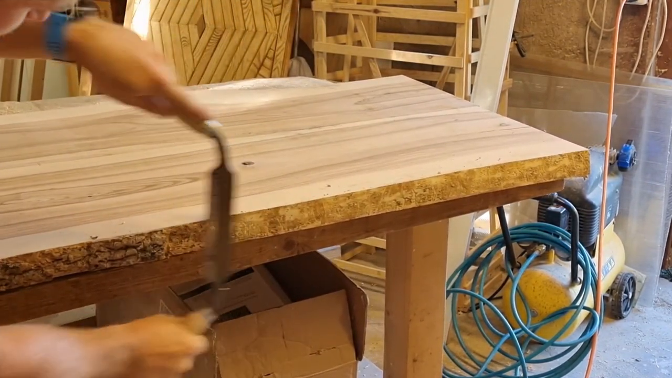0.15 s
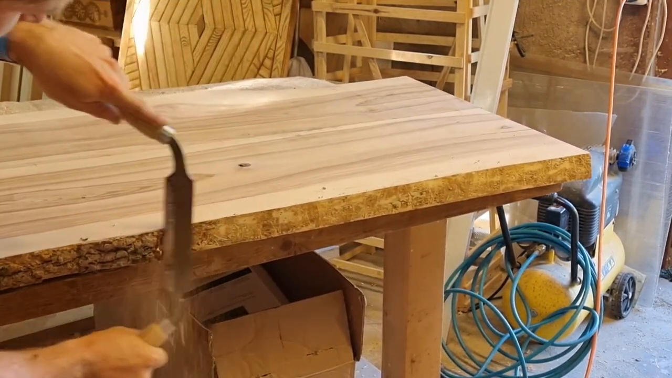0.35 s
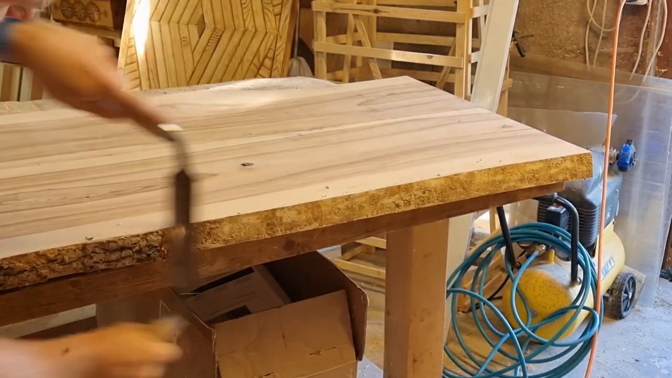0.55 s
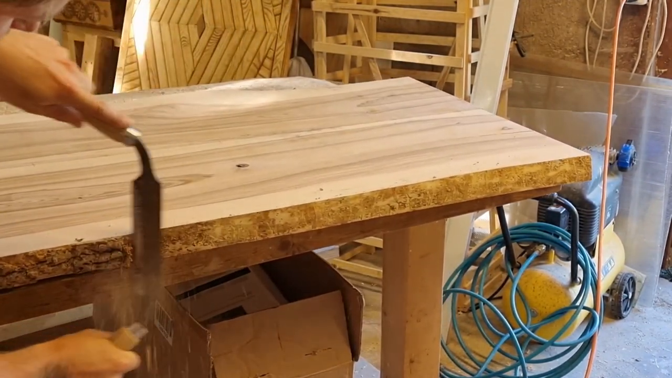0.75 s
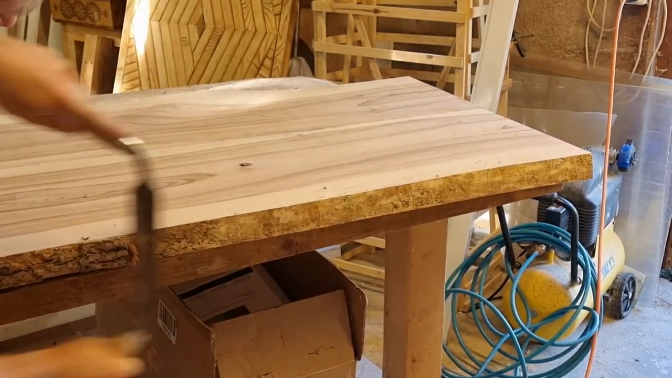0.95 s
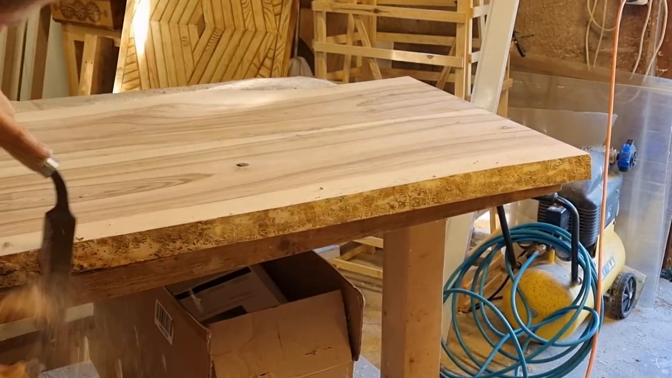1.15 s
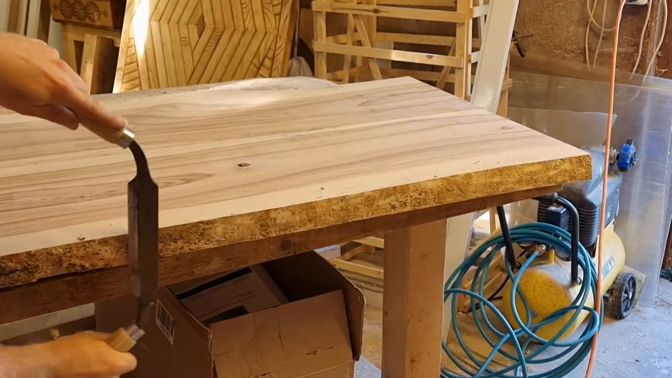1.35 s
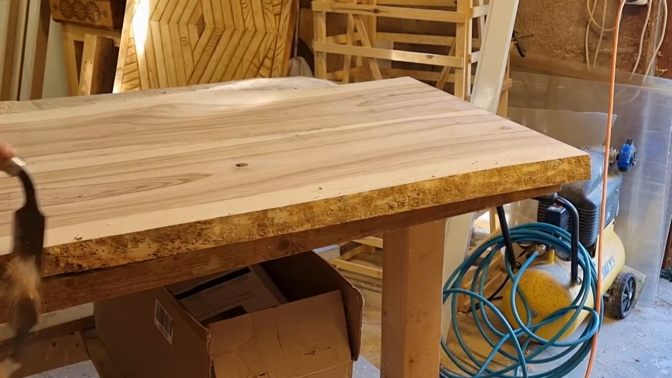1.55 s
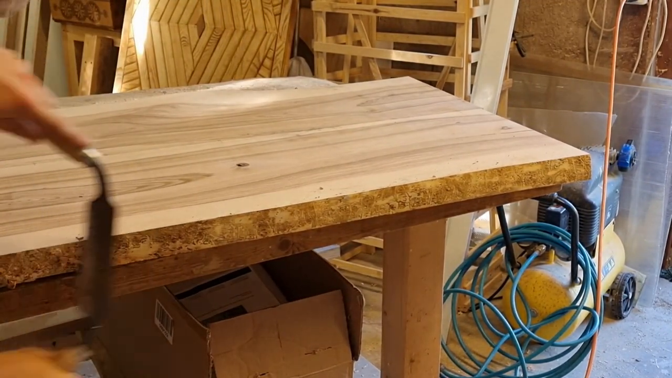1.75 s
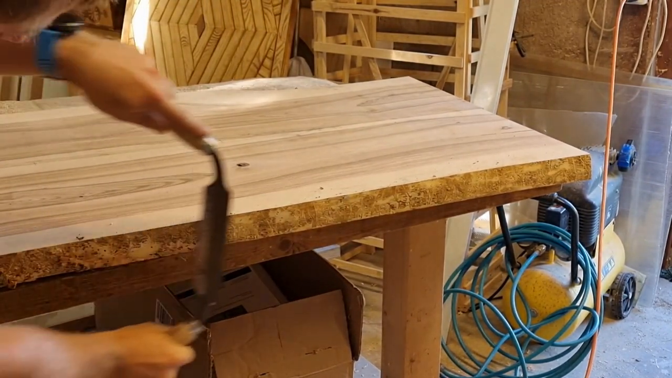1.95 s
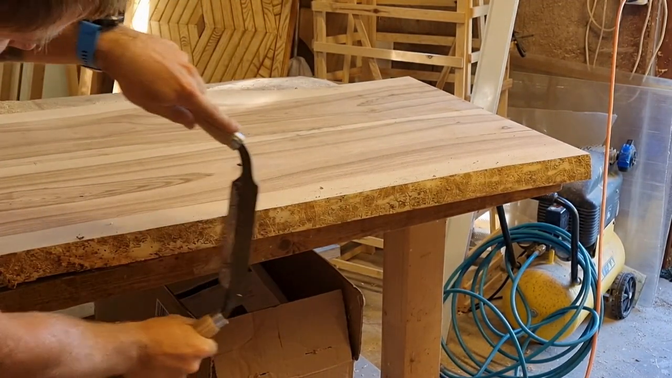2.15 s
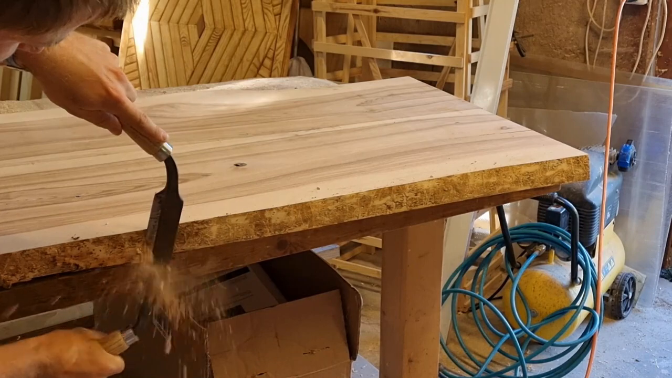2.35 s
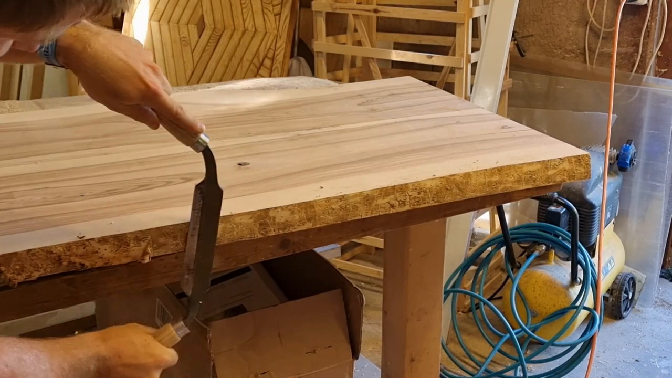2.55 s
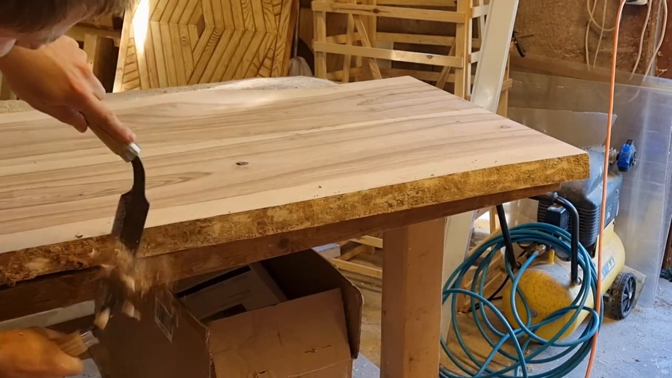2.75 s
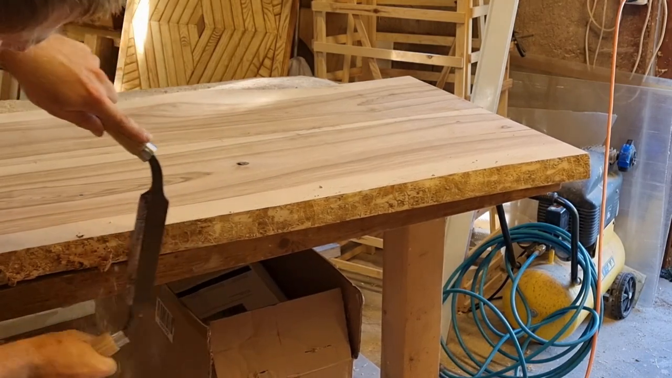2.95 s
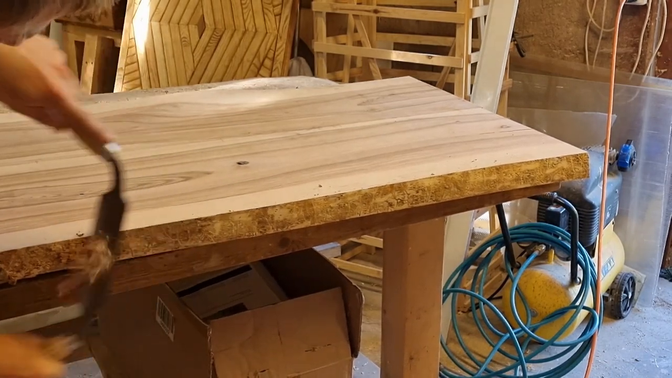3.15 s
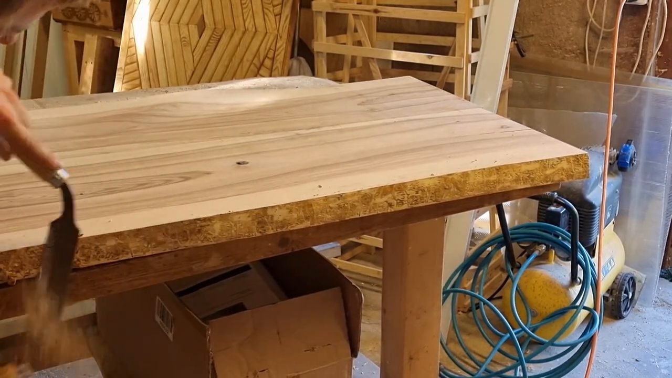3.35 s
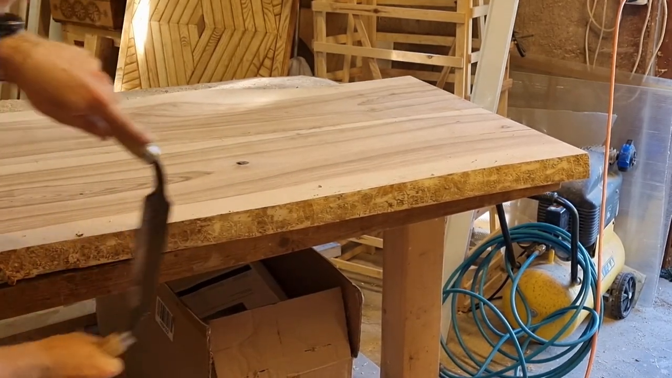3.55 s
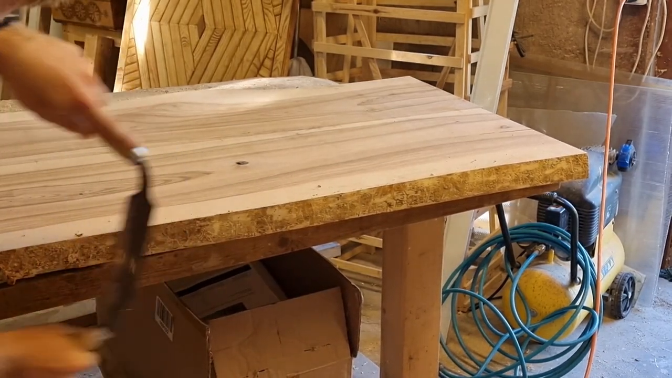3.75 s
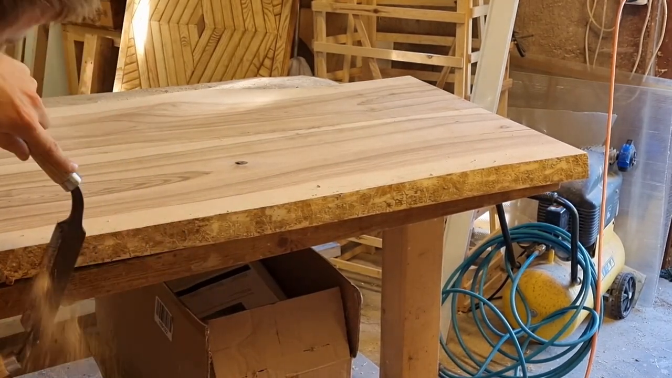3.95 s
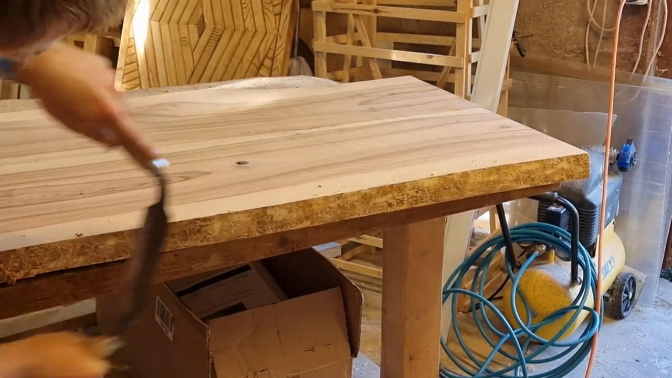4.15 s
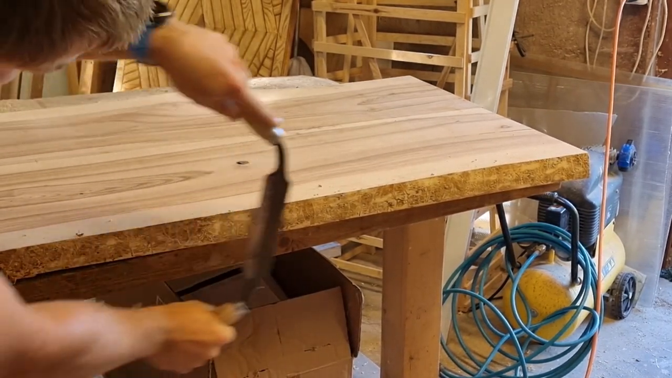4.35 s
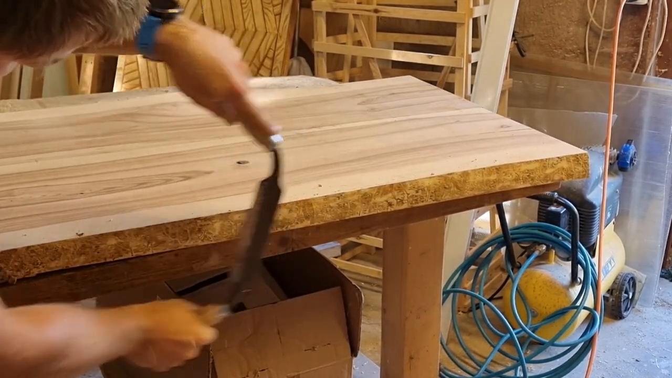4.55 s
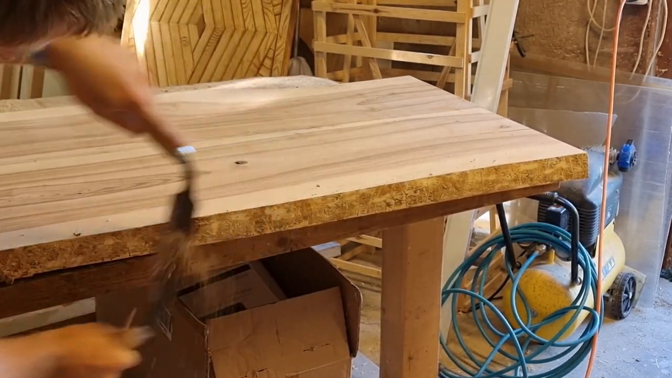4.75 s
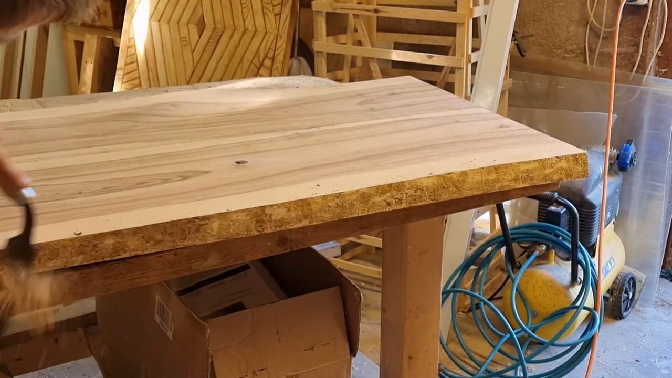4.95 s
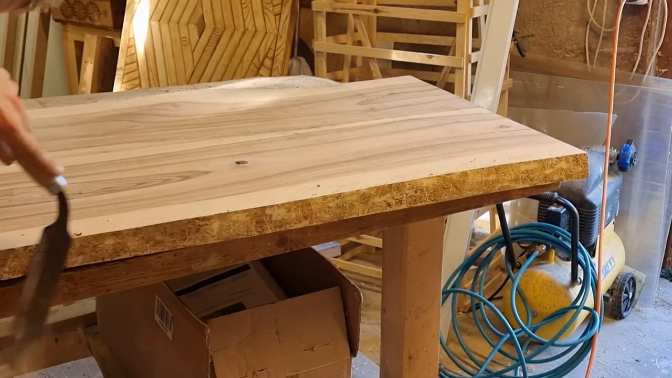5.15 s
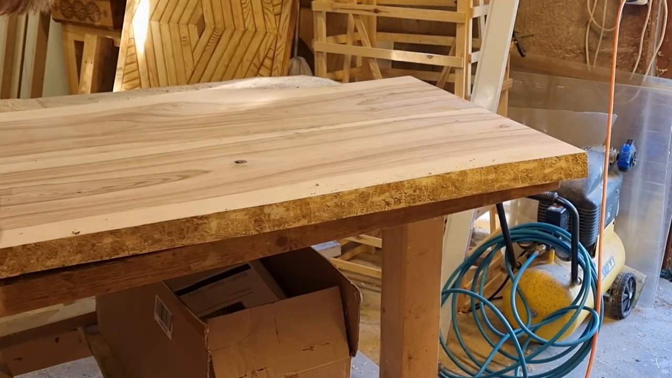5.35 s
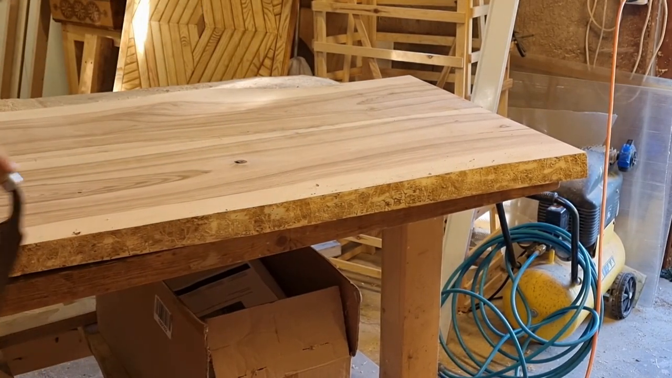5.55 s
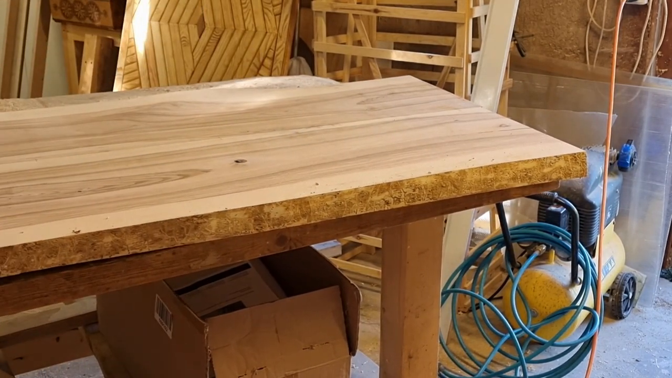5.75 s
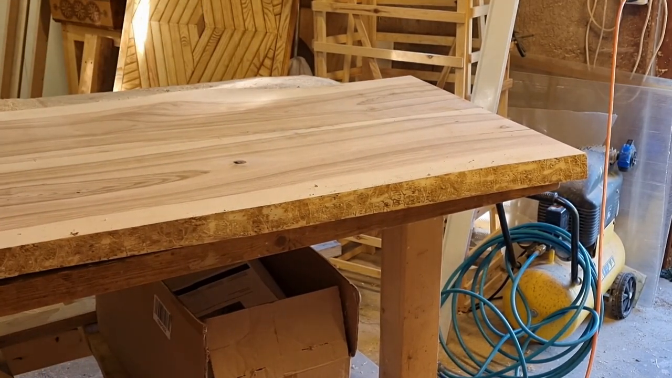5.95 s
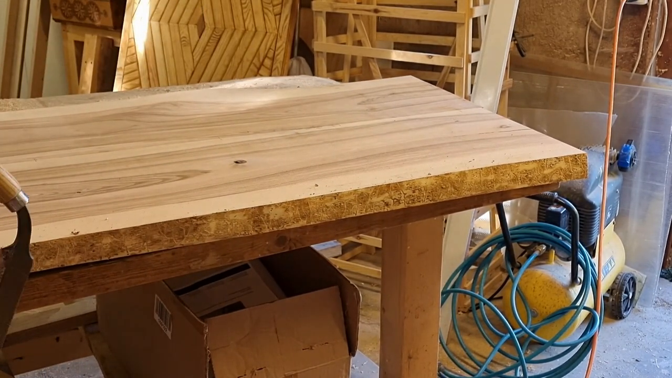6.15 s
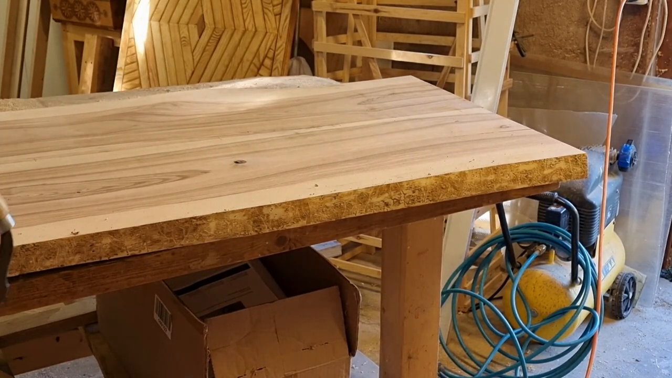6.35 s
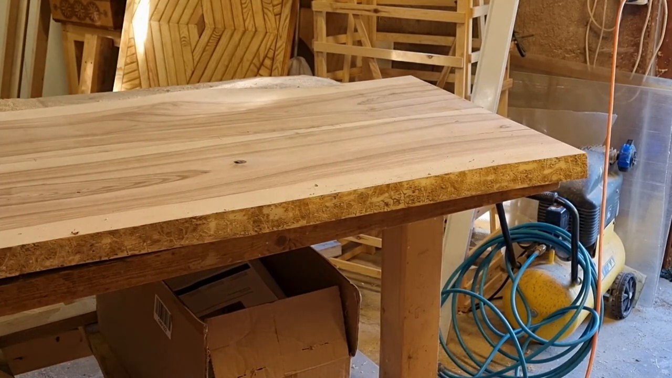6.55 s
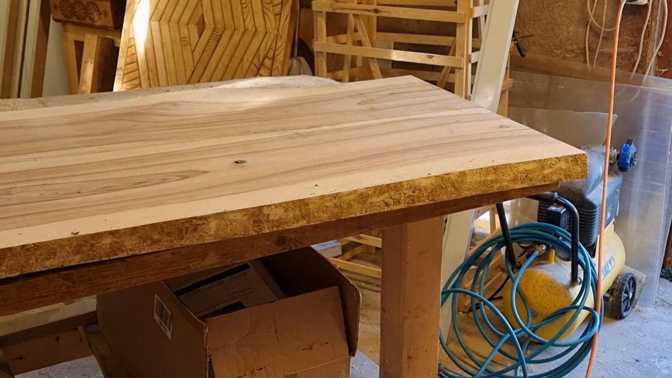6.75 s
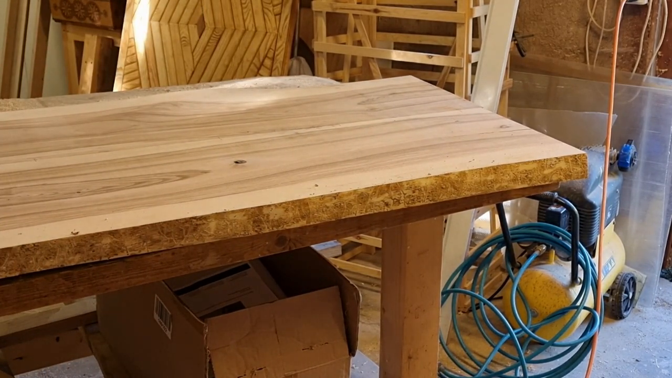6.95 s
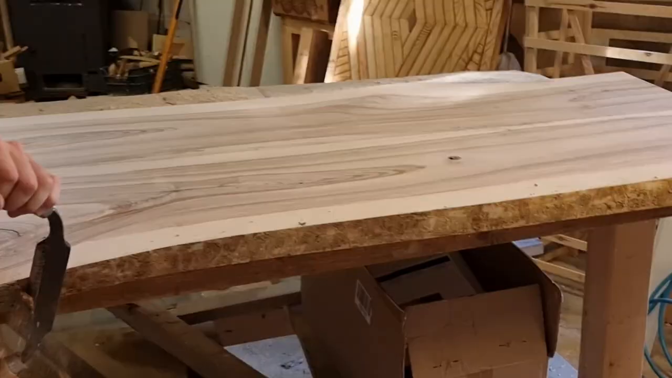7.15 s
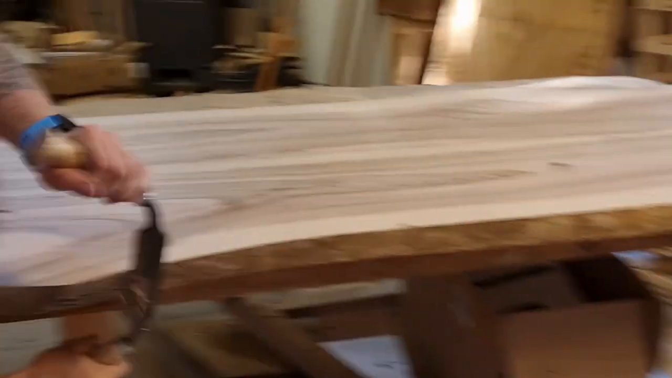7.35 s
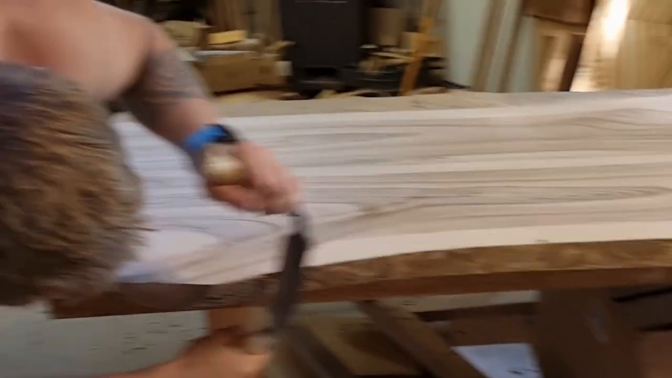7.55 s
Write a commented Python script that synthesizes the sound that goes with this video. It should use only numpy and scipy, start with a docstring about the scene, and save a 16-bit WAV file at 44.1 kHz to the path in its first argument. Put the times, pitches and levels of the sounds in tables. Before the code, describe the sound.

Quick, rasping blade pulls tear bark from a thick slab, mixed with small snaps and knocks, and a brief low rumble at the end.

```python
"""In the quiet air of a small workshop, a drawknife works the bark edge of a thick slab, left of a phone.
Pull after pull, the blade chatters through the bark, which tears with a hiss while the slab rings.
Single fibres snap, short woody clacks ring out with a dry crack, and the blade drags lightly between cuts.
Near the end, around the last pull, the phone is handled and rumbles."""
import sys
import numpy as np
from scipy import signal
from scipy.fft import rfft, irfft, next_fast_len
from scipy.io import wavfile
from scipy.ndimage import uniform_filter1d

SR = 44100
rng = np.random.default_rng(int(sys.argv[2]) if len(sys.argv) > 2 else 0)


def pcm_store(signal):
    """Save signal as 16-bit PCM."""
    levels = np.round(np.clip(np.atleast_2d(signal), -1, 1) * 32767)
    wavfile.write(sys.argv[1], SR, levels.astype(np.int16).T)


N = 339570
T = np.arange(N) / SR
CONTROL_T = np.arange(0, N / SR, .001)  # envelope clock, in seconds


def undb(db):
    return 10 ** (np.asarray(db) / 20)


def set_rms(x, db):
    return x * undb(db) / np.sqrt(np.mean(x ** 2))


def eq(x, points):
    """Shape a signal along (freq_hz, gain_db) points."""
    hz, db = np.transpose(points)
    size = next_fast_len(N)
    bins_hz = np.arange(size // 2 + 1) * SR / size
    gain = undb(np.interp(np.log(bins_hz + 1), np.log(hz), db))
    return irfft(rfft(x, size) * gain, size)[..., :N]


def resonate(x, hz, width_hz):
    """One resonance, gain 1 at its centre."""
    return signal.lfilter(*signal.iirpeak(hz, hz / width_hz, SR), x)


def wander(rate_hz):
    """Glides between random values; spread near 1."""
    hold = int(SR / rate_hz)
    return 1.12 * uniform_filter1d(np.repeat(rng.standard_normal(N // hold + 1), hold), hold)[:N]


def clicks(per_s, spread_db):
    """Random impulses, mostly small and a few large; rms 1."""
    when, size = rng.random((N, 2)).T
    impulses = (when < per_s / SR) * undb(-spread_db * np.log(size + 0.0025))
    return set_rms(impulses * np.sign(rng.standard_normal(N)), 0)


def add(track, start_s, sound):
    i = int(start_s * SR)
    track[i:i + len(sound)] += sound[:N - i]


def envelopes(start_s, attack_s, hold_s, db, fade_db_per_s):
    """One gain curve per blade contact: climb 40 dB over the attack up to start_s, hold, fade."""
    t = CONTROL_T - start_s[:, None]
    rise_db = 40 * np.minimum(t / np.reshape(attack_s, (-1, 1)), 0)
    fade_db = fade_db_per_s * np.maximum(t - hold_s[:, None], 0)
    return undb(db[:, None] + rise_db - fade_db)


def workshop_air():
    """A quiet, dark bed of room tone, centred in the bass and wide in the treble."""
    mid, side = eq(rng.standard_normal((2, N)),
                   [(30, -2), (81, 8), (666, 0), (1350, -5.5), (7270, -21.5), (13000, -17), (16000, -37.5)])
    side = eq(side, [(100, -13), (1500, 0.5)])
    return set_rms(np.array([mid + side, mid - side]), db=-59)


# Cutting pulls: bite_s, attack_s, tear_hold_s, tear_db, ring_hold_s, ring_db
PULLS = [(-.04, .01, 0.027, -44, 0.014, -36.5), (0.293, 0.053, 0.048, -33, 0.094, -35),
         (0.671, 0.0099, 0.039, -28.5, 0.058, -33.5), (1.07, 0.019, 0.049, -31, 0.019, -29),
         (1.664, 0.049, 0.0049, -31, 0.061, -43.5), (2.338, 0.092, 0.062, -35, 0.064, -32.5),
         (2.796, 0.024, 0.049, -33.5, 0.06, -31.5), (3.248, 0.037, 0.051, -34.5, 0.085, -34),
         (3.929, 0.16, 0.015, -40, 0.048, -33.5), (5.048, 0.076, 0.03, -33.5, 0.02, -29),
         (5.436, 0.0042, 0.004, -24.5, 0.067, -27), (5.865, 0.025, 0.011, -32, 0.015, -37),
         (7.461, 0.031, 0.066, -34, 0.092, -31.5)]
# Light touches and drags between cuts: start_s, hold_s, hiss_db, ring_db, ring_tilt_db_per_octave
DRAGS = [(0.24, 0.015, -76, -56, 13.5), (0.602, 0.11, -51.5, -48, 7.5), (0.76, 0.029, -45.5, -37, -1.5),
         (1.15, 0.056, -43.5, -40.5, 8.5), (1.499, 0.099, -44, -44, 15.5), (1.827, 0.069, -60, -92, 31.5),
         (2.076, 0.083, -52, -50.5, -3), (2.261, 0.052, -85, -52, 13), (2.633, 0.028, -95, -61, -11),
         (3.659, 0.065, -89, -41, -1), (3.737, 0.016, -54, -59.5, -5), (3.844, 0.089, -75, -49.5, 11.5),
         (4.243, 0.094, -80, -57, -2.5), (4.334, 0.048, -84, -43.5, -5), (4.406, 0.0098, -47.5, -60, -8),
         (4.701, 0.336, -58.5, -46, 6.5), (5.25, 0.097, -107, -49.5, -8.5), (5.779, 0.11, -69, -34, -1),
         (6.087, 0.011, -55, -37.5, 6), (6.291, 0.012, -43, -29, -1), (6.413, 0.093, -56, -63.5, 16.5),
         (6.596, 0.044, -48, -68, 22.5), (6.758, 0.32, -63, -93, 5), (6.989, 0.0089, -71, -66.5, 18.5),
         (7.187, 0.03, -50, -35, -5), (7.313, 0.084, -83, -47.5, -12), (7.411, 0.086, -51, -53, 16.5),
         (7.558, 0.017, -36, -46.5, -6)]


def drawknife():
    """Each pull or drag tears the bark and rings the slab; in a pull the slab loads later and slower."""
    bite_s, attack_s, tear_hold_s, tear_db, ring_hold_s, ring_db = np.transpose(PULLS)
    pull_tear = envelopes(bite_s, attack_s, tear_hold_s, tear_db, fade_db_per_s=316.5).sum(0)
    pull_ring = envelopes(bite_s + 0.014, attack_s + 0.071, ring_hold_s, ring_db, 270.5).sum(0)
    start_s, hold_s, hiss_db, drag_db, tilt = np.transpose(DRAGS)
    drag_hiss = envelopes(start_s, 0.0036, hold_s, hiss_db, 242.5).sum(0)
    drag_rings = envelopes(start_s, 0.0036, hold_s, drag_db, 242.5)

    def drive_at(hz):
        tilt_gains = undb(tilt * np.log2(hz / 400))  # each drag has its own brightness
        return np.interp(T, CONTROL_T, pull_ring + tilt_gains @ drag_rings)

    return slab_ring(drive_at) + bark_tear() * np.interp(T, CONTROL_T, pull_tear + drag_hiss)


# Resonances of slab and bench: pitch_hz, width_hz, level_db
SLAB_MODES = [(103, 26, -5.5), (253.6, 36, -0.5), (296.5, 14, -7.5), (342.8, 17, 5.5), (394, 28, 2),
              (501, 26.4, 1.5), (601, 160, -3), (810, 36, -1.5), (970.5, 107, -4), (1288, 33, -7.5),
              (1550, 25, -14.5)]


def slab_ring(drive_at):
    """The woody body: uneven chatter feeds each mode more or less as the blade moves along the edge."""
    chatter = clicks(per_s=4000, spread_db=2.5) * undb(3.37 * wander(45))
    body = np.zeros(N)
    for hz, width_hz, db in SLAB_MODES:
        drift = undb(2.5 * wander(8))
        body += undb(db) * resonate(chatter * drive_at(hz) * drift, hz, width_hz)
    return eq(body, [(45, -22), (110, 1.5), (2200, -2), (5000, -7.5)]) * undb(16)


# Tone of tearing bark: freq_hz, gain_db
TEAR_EQ = [(800, -2.5), (2300, 4), (3500, 4), (5100, 5.5), (8400, -1.5), (10500, -1.5), (12600, 3),
           (15300, 2)]


def bark_tear():
    """Dense fibre clicks make a hiss; a long blade tears in several places, so the two mics differ."""
    shared = clicks(per_s=9000, spread_db=2.1)
    fibres = shared + 2.2 * np.array([clicks(9000, 3.2), clicks(9000, 3.1)])
    bursts = signal.lfilter([1], [1, -.993], np.abs(clicks(160, 2.7)))
    flicker = undb(1.2 * wander(90))
    return set_rms(eq(fibres * (1 + 0.12 * bursts) * flicker, TEAR_EQ), db=7.5)


def room_reverb(x, t60_s=0.3):
    """Early echoes off floor and bench, then a short, dense, dark tail, its own for each mic."""
    t = np.arange(int(.35 * SR)) / SR
    tail = rng.standard_normal((2, len(t))) * np.minimum(t / 0.005, 1) * undb(-60 * t / t60_s)
    response = set_rms(tail, db=-2.5) / np.sqrt(len(t))
    for lag_s, db in ((.0068, -10.8), (.0135, -14.6)):
        response[[0, 1], int(lag_s * SR) + rng.integers(0, 12, 2)] += undb(db)
    wet = signal.fftconvolve(x[None], response, axes=1)[:, :N]
    mid = wet.mean(0)
    side = eq(wet - mid, [(100, -21), (500, -1.5), (1500, 0)])  # long waves reach both mics alike
    return eq(mid + side, [(3000, 1), (14000, -11.5)])


# Single fibres breaking: start_s, level_db, pitch_hz
FIBRE_SNAPS = [(0.315, -9.5, 12600), (0.694, -7.5, 5840), (1.08, -4.5, 6050), (1.6627, -15.5, 6200),
               (2.0765, -40, 8850), (2.3393, -10.5, 10100), (2.371, -12, 12200), (2.397, -15.5, 10900),
               (2.796, -10, 12700), (2.8175, -9.5, 5940), (3.277, -11, 6170), (3.43, -33, 3600),
               (3.881, -19.5, 13000), (3.9252, -9.5, 13600), (4.333, -37.5, 9100), (5.0254, -27.5, 5900),
               (5.0614, -9, 5640), (5.437, -10.5, 5400), (5.469, -34, 5150), (5.8905, -20, 5940),
               (6.488, -33, 5000), (7.462, -14.5, 6230), (7.4983, -17, 6540)]


def fibre_snaps():
    """A snapping fibre rings two or three cycles and splinters in a short hiss near the same pitch."""
    out, t = np.zeros(N), np.arange(400) / SR
    for start_s, db, hz in FIBRE_SNAPS:
        tick = np.sin(2 * np.pi * hz * t) * np.exp(-t * hz / 2.7)
        splinter = resonate(rng.standard_normal(len(t)), hz, 0.5 * hz) * np.exp(-t / 0.0018)
        add(out, start_s, undb(db) * (tick + 0.48 * splinter))
    return out * undb([[7.5], [2.5]])  # panned left


# Short woody clacks: start_s, level_db, pitch_hz, brightness_db
WOOD_CLACKS = [(0.354, -16, 1010, -22), (0.371, -14.5, 1040, -35), (0.605, -23, 910, -10.5),
               (0.657, -6, 1120, -17), (0.769, -26, 1770, 11.5), (0.967, -35, 1240, -4.5),
               (1.043, -32.5, 1400, -7), (1.165, -11, 1210, -3), (1.185, -9, 1390, -8.5),
               (1.357, -31.5, 1400, -14), (1.416, -21, 1200, -22), (1.469, -14, 1120, -22.5),
               (1.507, -8, 1064, -14), (1.557, -7.5, 1110, -15), (1.872, -30, 1240, -6),
               (1.909, -31.5, 1120, -8.5), (2.095, -29, 940, -6), (2.785, -9.5, 1150, -18.5),
               (3.093, -42, 1050, 7), (3.236, -22.5, 1050, 0.5), (3.315, -27, 1470, 8.5),
               (3.523, -32.5, 1090, -6), (3.736, -22.5, 1300, -9.5), (4.409, -18, 1356, -11.5),
               (4.51, -28.5, 1160, -12.5), (4.567, -38.5, 1210, 1.5), (5.874, -20.5, 1160, -28),
               (6.092, -12, 960, -14), (6.175, -25.5, 1080, -24), (6.211, -23.5, 1010, -22),
               (6.287, -9, 1080, -11), (6.432, -21.5, 1090, -12.5), (6.442, -29.5, 1080, -13),
               (6.46, -29.5, 1120, -12), (6.561, -35.5, 905, -11), (6.618, -33, 1060, -17),
               (6.634, -29, 1015, -16), (6.71, -25, 1200, -14), (7.505, -9, 1490, -13)]


def wood_clacks(rebounds=5, overtone_hz=2065):
    """Probably the blade on the slab: a brief ring and a dry crack, then weaker, off-pitch rebounds."""
    knocks, cracks, t = np.zeros(N), np.zeros(N), np.arange(900) / SR
    draws = rng.random((len(WOOD_CLACKS), rebounds, 3))
    for (start_s, db, hz, brightness_db), draw in zip(WOOD_CLACKS, draws):
        impact = undb(db + 12.5) * (1 - np.exp(-t / 0.00049)) * np.exp(-t / 0.0015)
        add(knocks, start_s, impact * np.sin(2 * np.pi * hz * t))
        grit = 2.18 * rng.standard_normal(len(t))
        overtone = 1.24 * undb(0.36 * db) * np.sin(2 * np.pi * overtone_hz * t)  # grows on hard clacks
        add(cracks, start_s, impact * undb(brightness_db) * (grit + overtone))
        lag_s = 0
        for gap, detune, loss in draw:
            lag_s += .004 + .007 * gap
            rebound_hz = hz * (1 + 0.47 * (detune - .5))
            rebound_gain = undb(-3 - 410 * lag_s - 8 * loss)
            add(knocks, start_s + lag_s, impact * rebound_gain * np.sin(2 * np.pi * rebound_hz * t))
    return eq(knocks, [(60, -36), (300, -0.5)]), eq(cracks, [(700, -5), (3600, 0), (10000, -27.5)])


# Bumps on the handled phone: start_s, level_db
PHONE_BUMPS = [(7.184, -24), (7.221, -27), (7.304, -19.5), (7.392, -18), (7.479, -25), (7.565, -37)]


def handling_rumble(case_hz=60):
    """Each bump swings the phone's case a few slow cycles, over a low shake that dies away."""
    thuds, t = np.zeros(N), np.arange(SR // 5) / SR
    for start_s, db in PHONE_BUMPS:
        add(thuds, start_s, undb(db) * np.sin(2 * np.pi * case_hz * t) * np.exp(-t / 0.019))
    held_s = T - PHONE_BUMPS[0][0]
    fade = np.clip(held_s / 0.01, 0, 1) * undb(-44 * held_s)
    shake = resonate(resonate(rng.standard_normal(N), case_hz, 60), case_hz, 60)
    return (thuds + fade * set_rms(shake, db=-34.5)) * undb([[-4.2], [2.8]])  # panned right


def scene():
    """Mix the woodwork at the phone's two mics with its reverb, the handling and the room tone."""
    knocks, cracks = wood_clacks()
    woodwork = drawknife() + fibre_snaps() + knocks + cracks
    left = eq(woodwork[0], [(6000, 0), (8000, -1), (13000, 1)])
    right = np.roll(woodwork[1], 5)  # the far mic hears it 5 samples later
    reverb_send = woodwork.mean(0) - 0.8 * knocks  # the knocks are close by and stir the room less
    direct = np.array([left, right]) * undb(-1.5)
    return direct + room_reverb(reverb_send) + handling_rumble() + workshop_air()


def record(dry):
    """The phone rounds the loudest peaks, loses the deepest bass and cuts the top steeply."""
    rounded = np.tanh(0.72 * dry) / 0.84
    low_cut = signal.butter(3, 38, "high", fs=SR, output="sos")
    high_cut = signal.ellip(12, .2, 100, 15900, fs=SR, output="sos")
    return signal.sosfilt(high_cut, signal.sosfilt(low_cut, rounded))


dry = scene()
out = record(dry)
pcm_store(out)
```